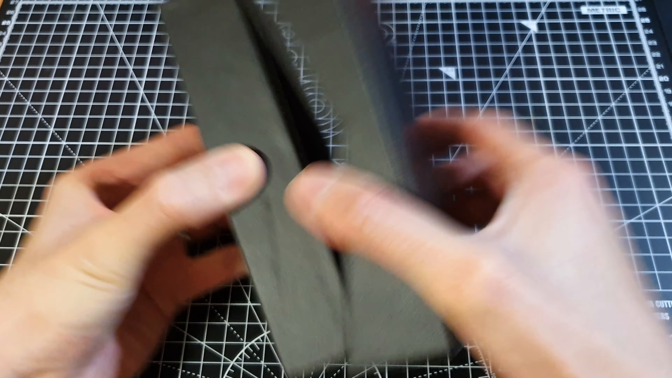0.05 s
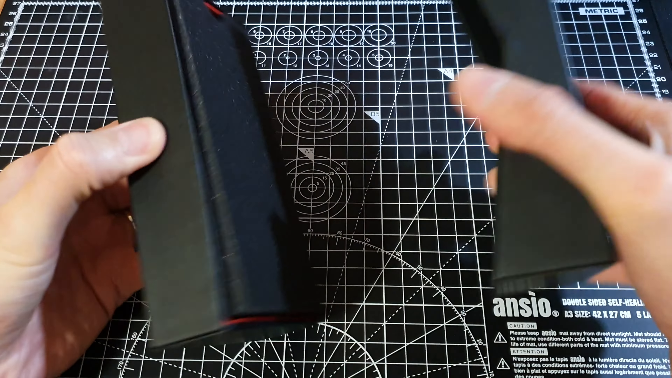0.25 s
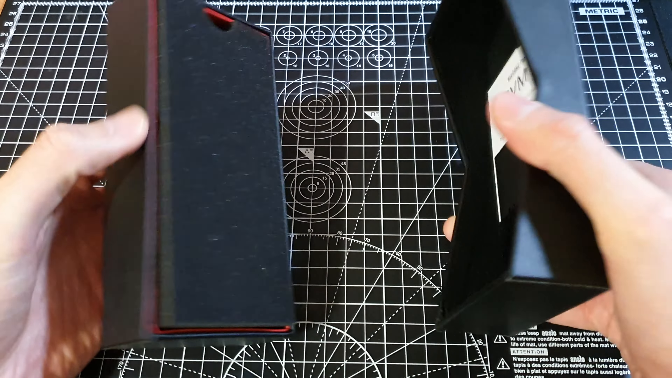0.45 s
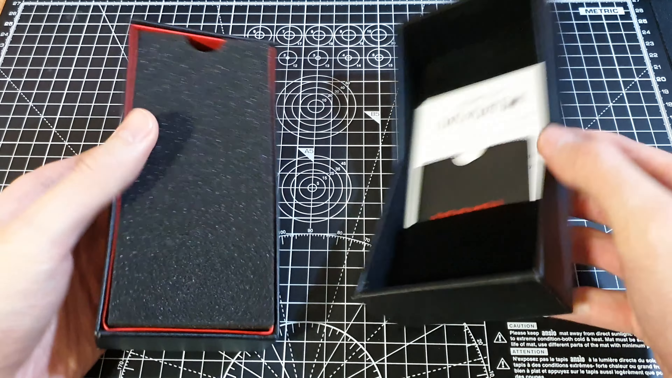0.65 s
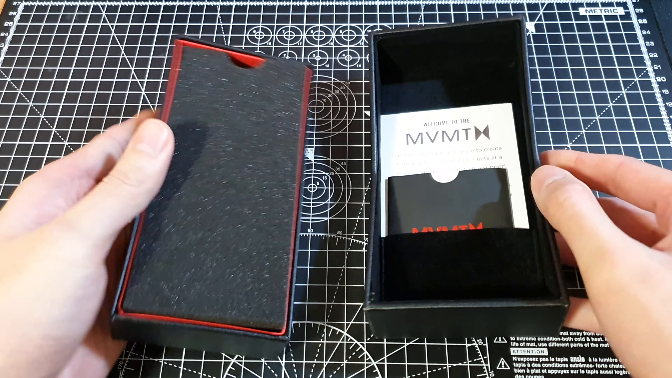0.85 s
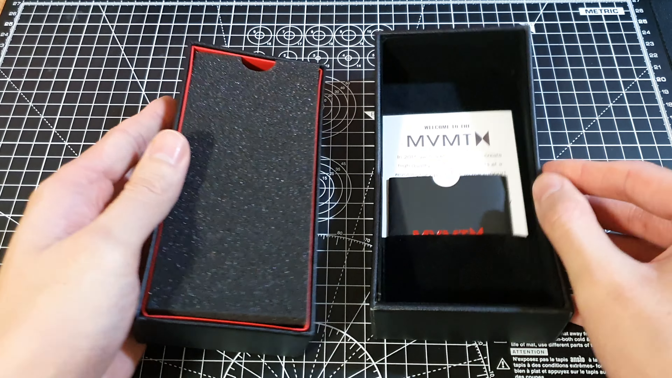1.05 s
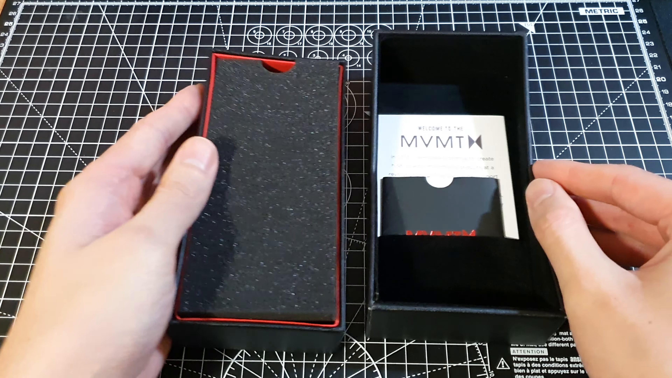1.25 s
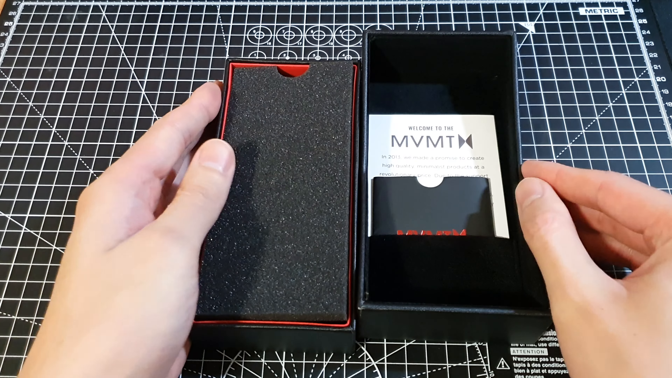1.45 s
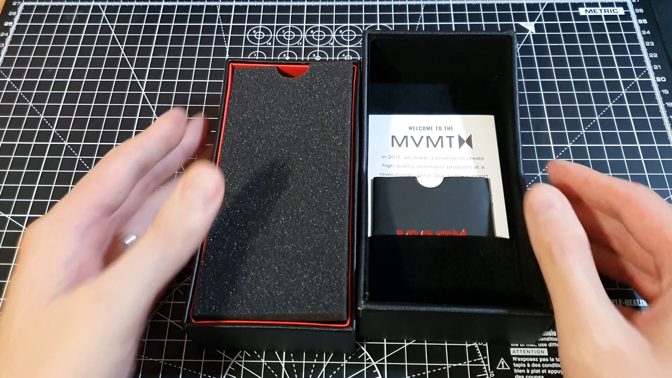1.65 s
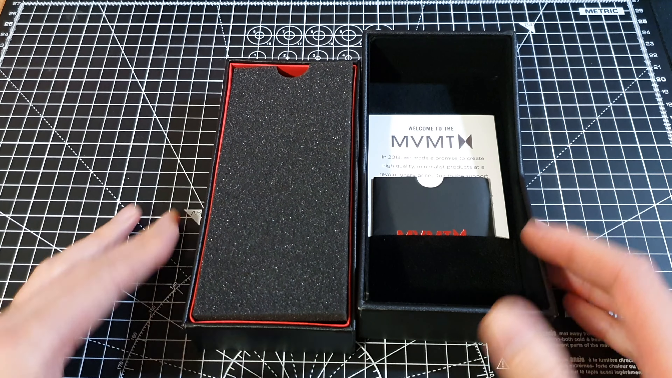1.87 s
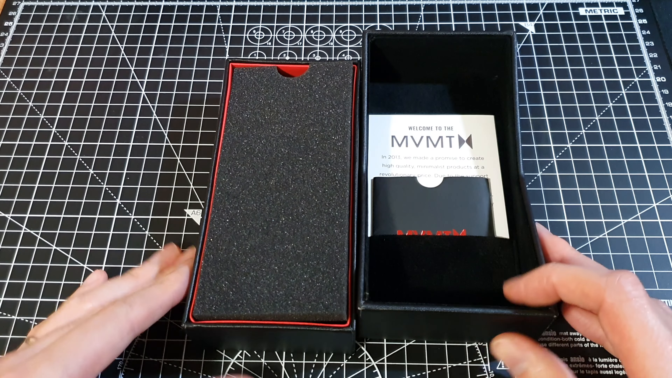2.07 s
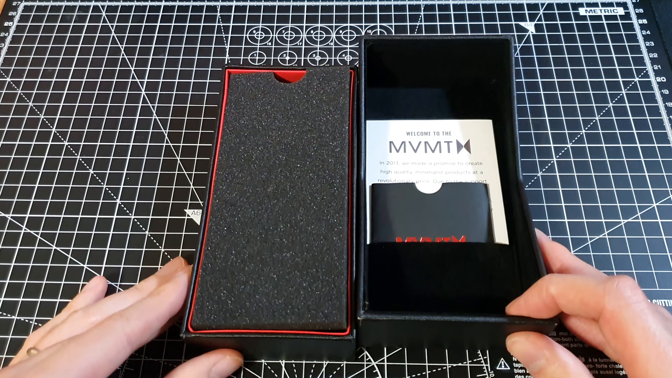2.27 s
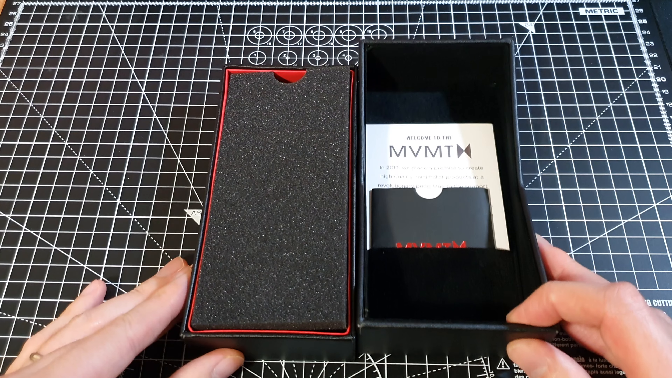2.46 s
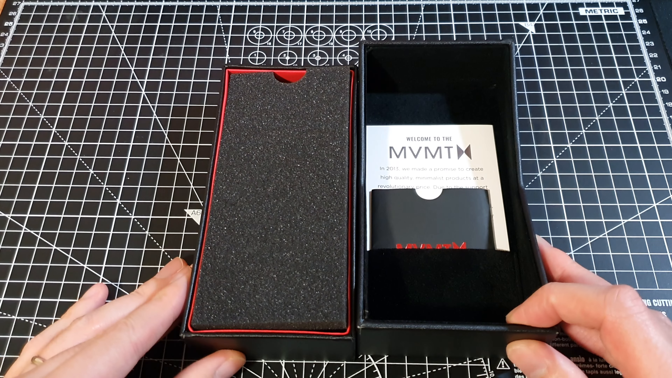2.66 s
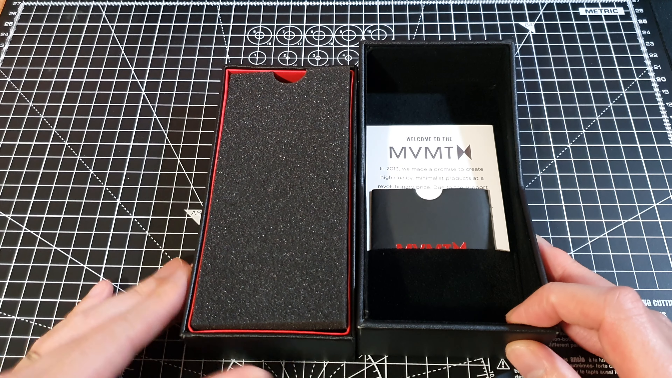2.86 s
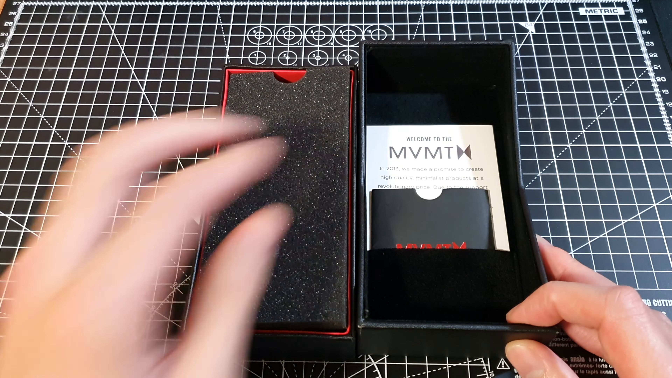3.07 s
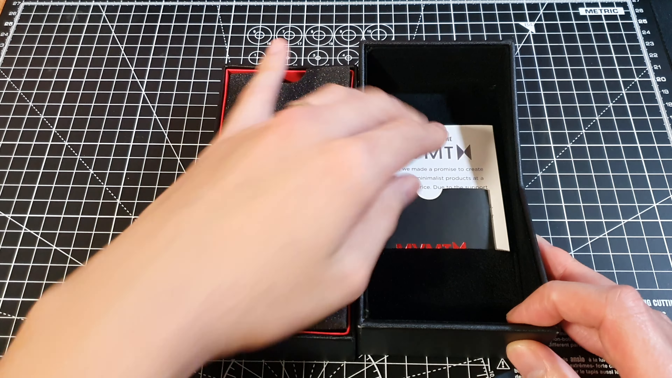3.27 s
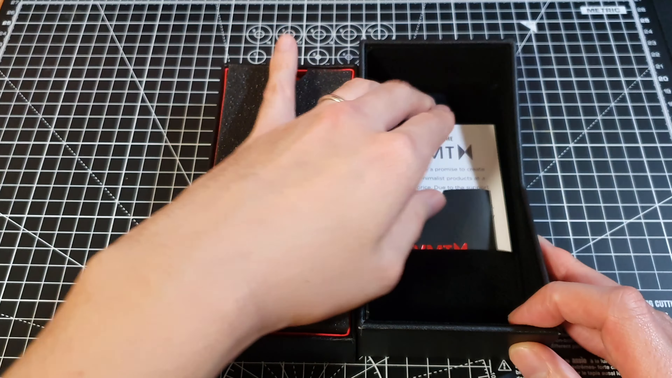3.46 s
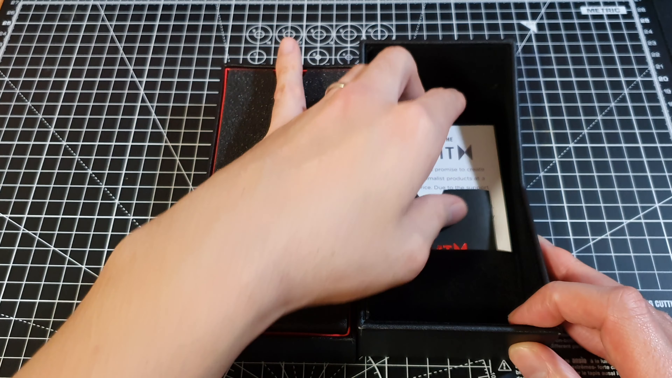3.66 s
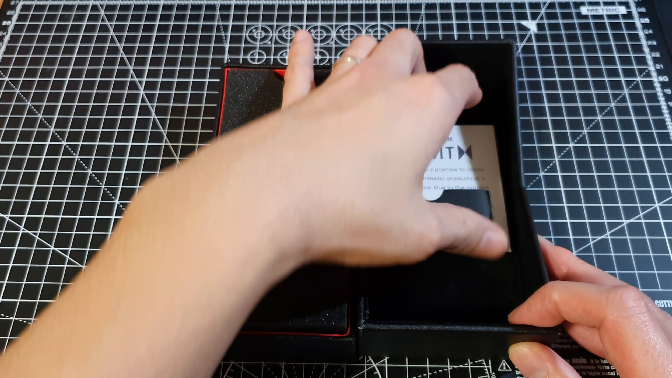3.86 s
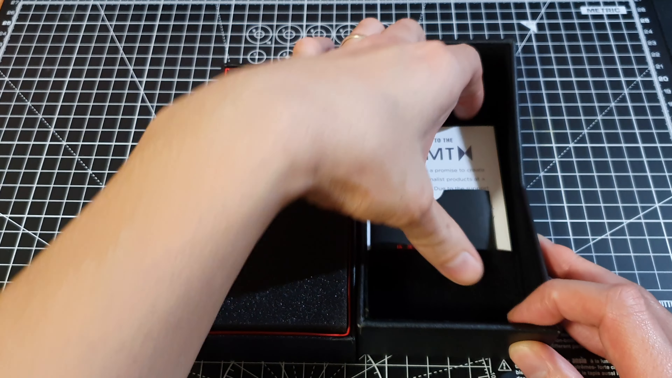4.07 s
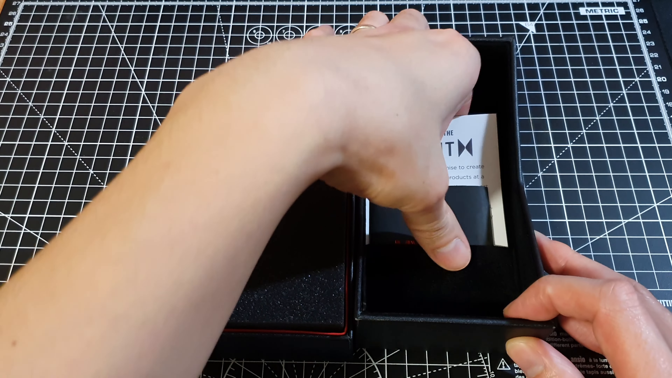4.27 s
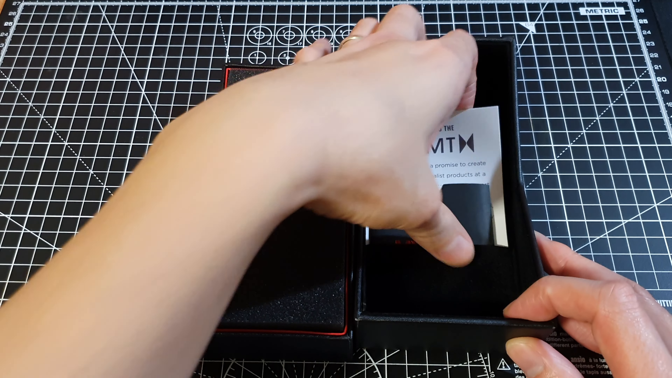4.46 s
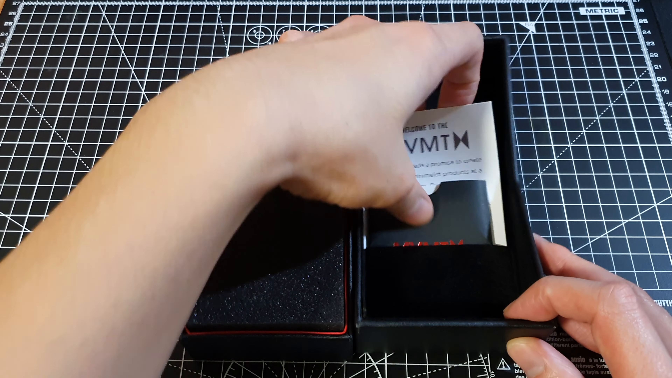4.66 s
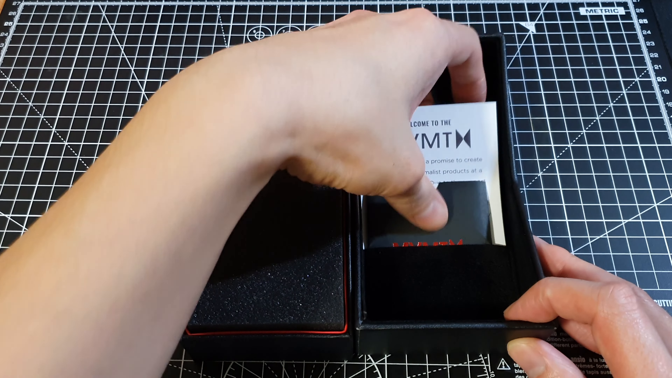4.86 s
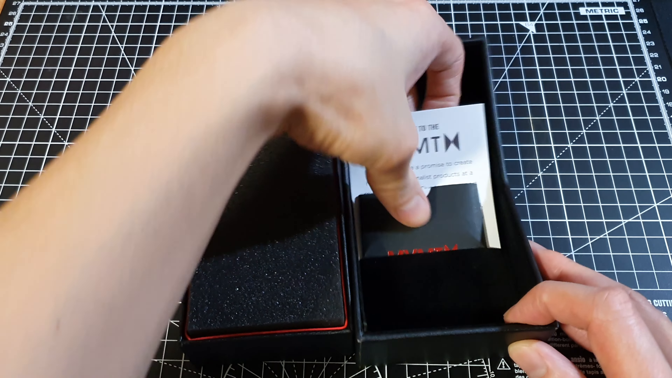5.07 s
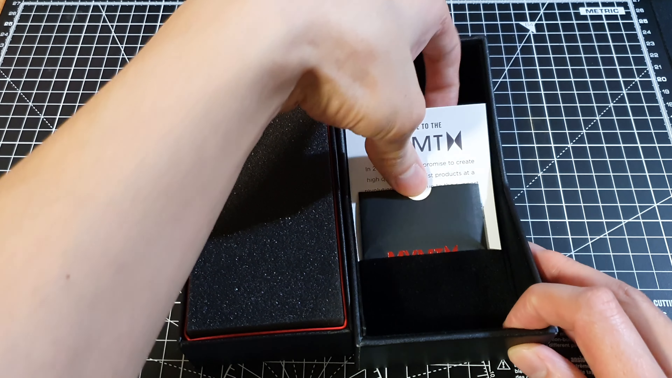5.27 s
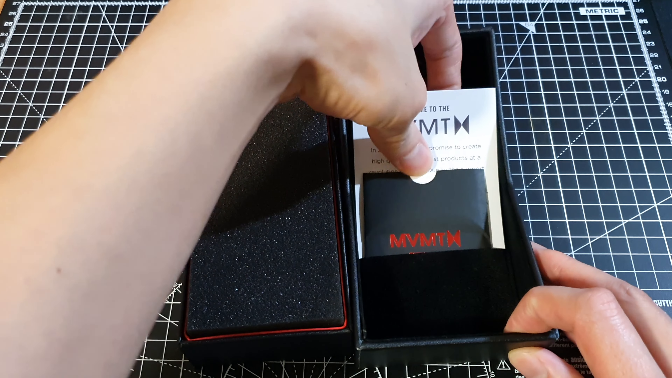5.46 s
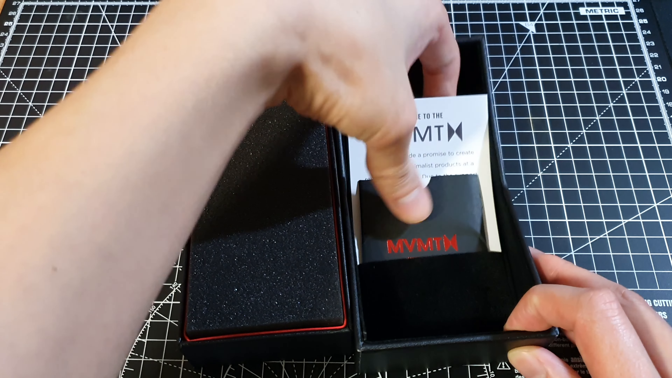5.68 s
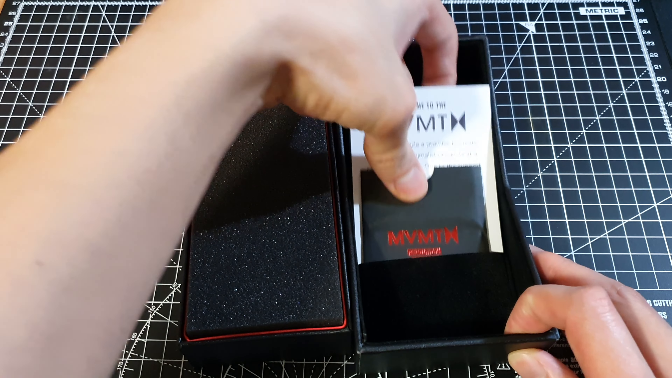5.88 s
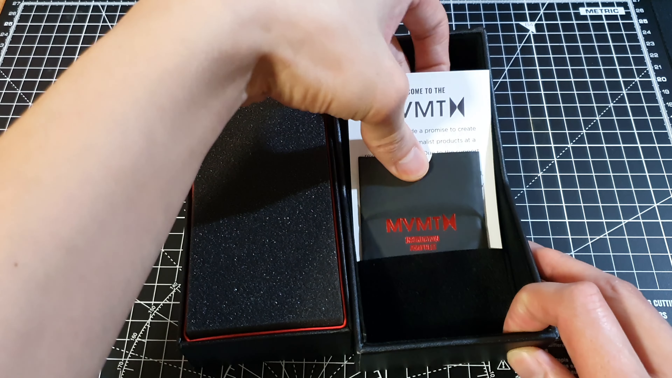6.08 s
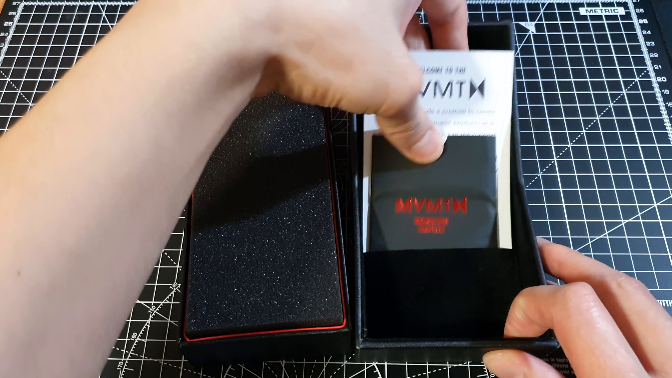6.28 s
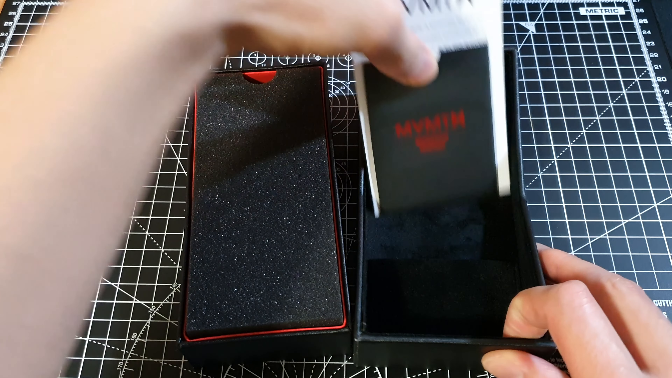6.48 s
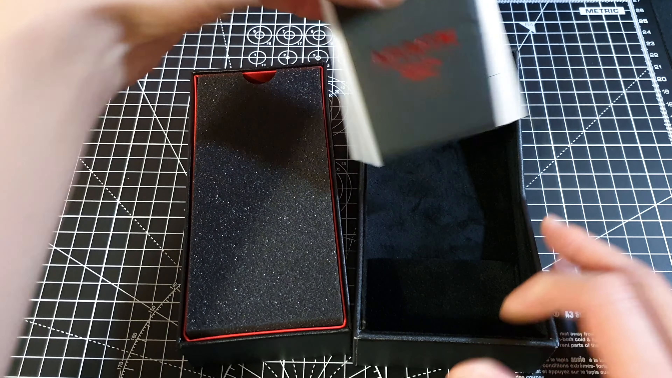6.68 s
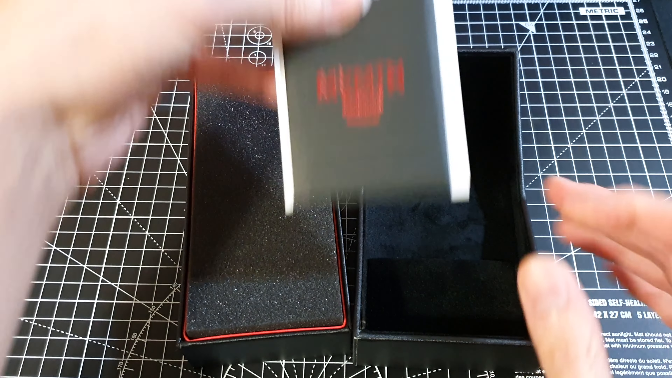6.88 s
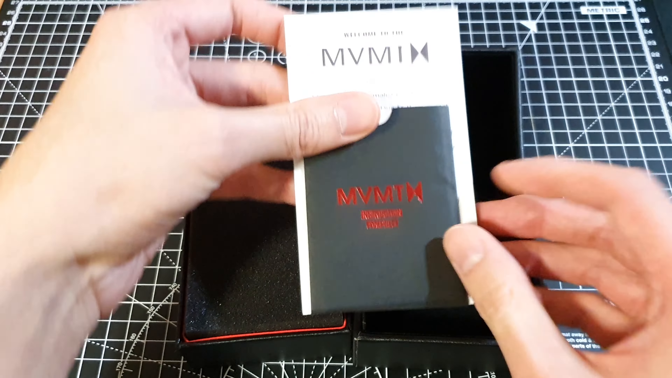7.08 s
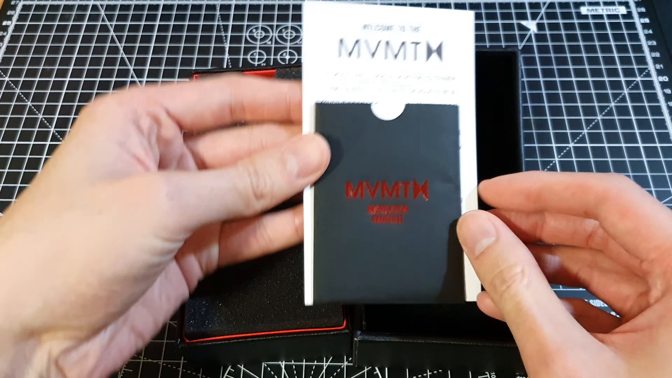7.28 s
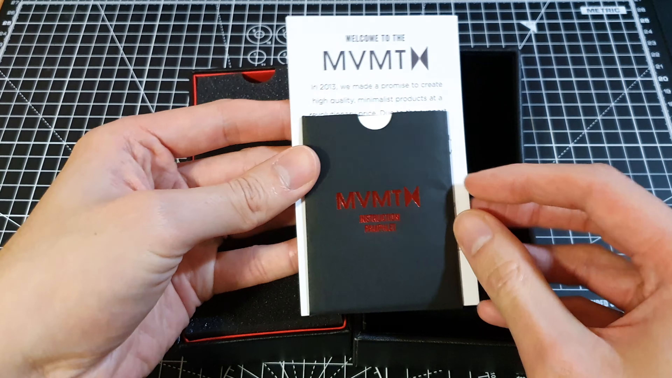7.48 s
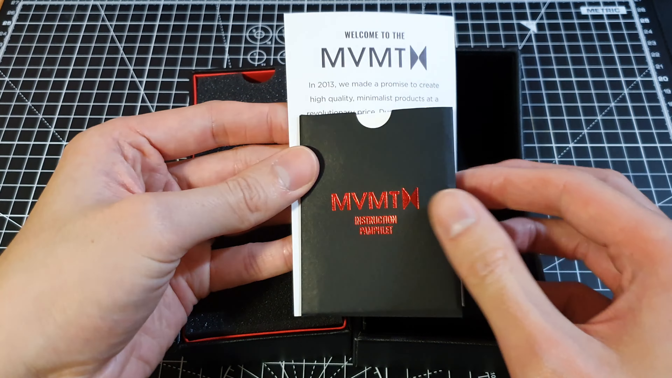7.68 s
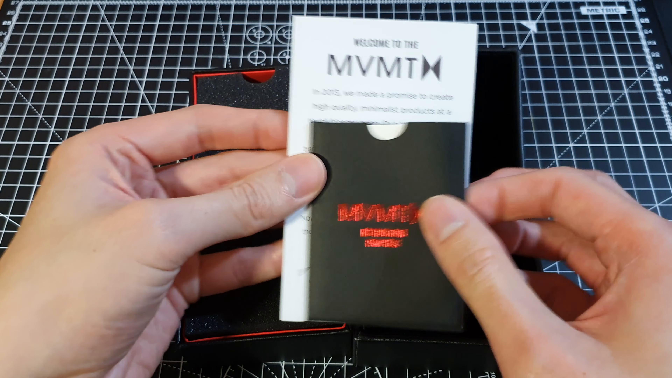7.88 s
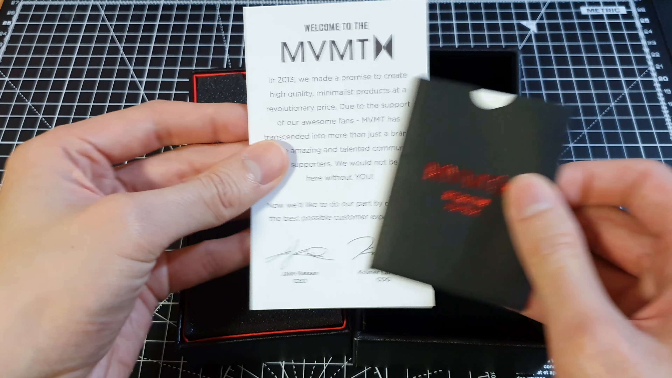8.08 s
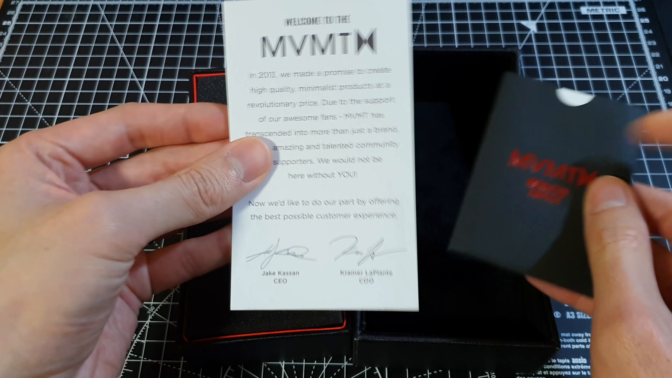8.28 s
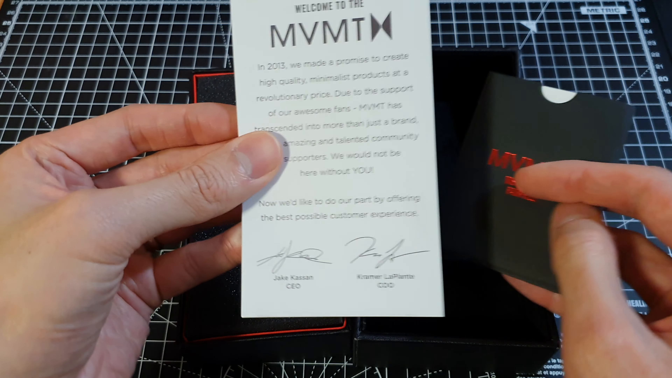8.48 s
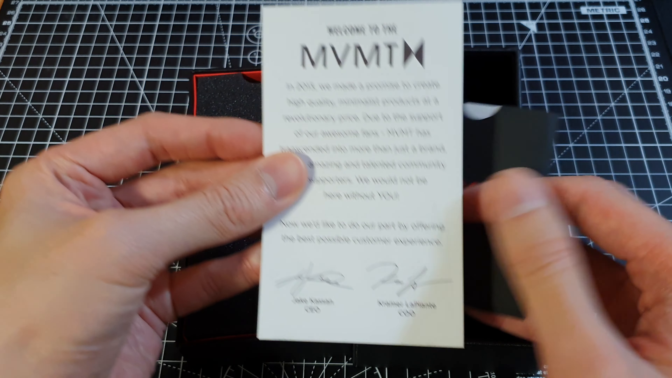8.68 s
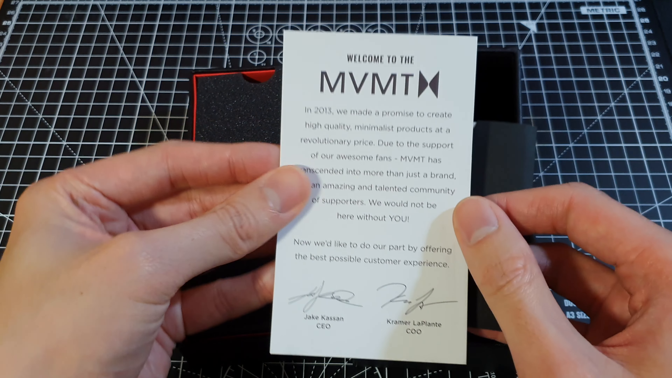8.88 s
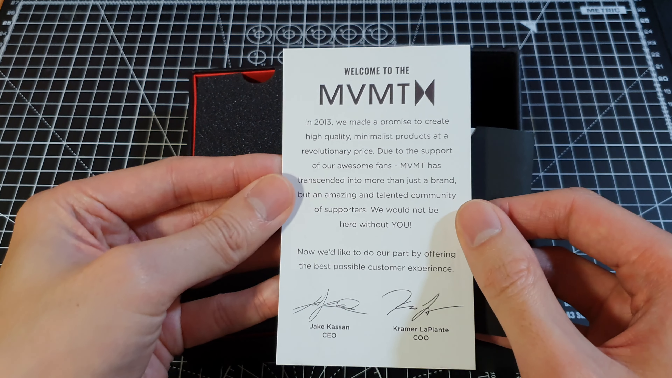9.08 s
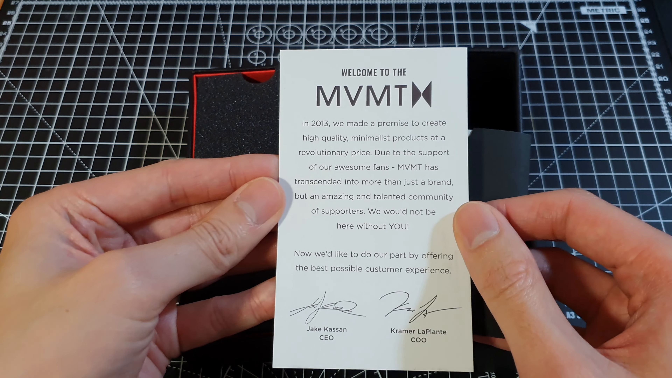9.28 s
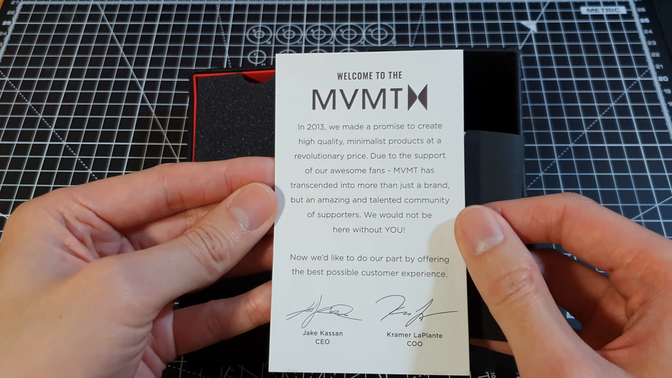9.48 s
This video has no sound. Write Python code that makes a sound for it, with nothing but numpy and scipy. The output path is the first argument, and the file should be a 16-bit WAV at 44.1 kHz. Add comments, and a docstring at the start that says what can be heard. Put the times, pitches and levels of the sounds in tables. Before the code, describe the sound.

In a small quiet room, a tight cardboard lid groans and rubs free with light taps, then the box halves clatter onto a desk, one blow very loud. Smaller knocks settle them together. After a near-silent pause, fingers brush and scratch inside, dragging out a card; the box drops with a thud, and card and paper sleeve slide apart with soft ticks. Close stereo microphone, faint hum.

```python
"""Opening a stiff cardboard box

On a desk in a small room the lid rubs off a box; both halves are knocked down and pushed together.
Fingers scuff inside, draw out a card in a paper sleeve (the box drops with a thud) and slide the two apart.
Blows are short bursts ringing the modes of board and desk; friction is noise in clumps and snaps, with
a colour for each pair of surfaces. Close echoes, a diffuse room, its background and faint hum surround them.
"""
import sys
import numpy as np
from scipy import signal
from scipy.fft import rfft, irfft, next_fast_len
from scipy.io import wavfile
from scipy.ndimage import uniform_filter1d, map_coordinates

SR = 44100
rng = np.random.default_rng(int(sys.argv[2]) if len(sys.argv) > 2 else 0)


def transcribe(u):
    """Save the signal u as a 16-bit wav file named by the first command-line argument.

    u: samples, shape (n,) or (channels, n), limited to [-1, 1]; the rate is SR.
    q: integer samples, one column per channel.
    """
    v = np.clip(np.atleast_2d(u).T, -1, 1)
    q = np.round(v * 32767).astype(np.int16)
    wavfile.write(sys.argv[1], SR, q)


N = 420713
TIME = np.arange(N) / SR
CONTROL_TIME = TIME[::32]  # coarse clock for slow gains
HIT_TIME = np.arange(SR // 2) / SR  # clock of one blow

# friction spectrum of card: (frequency [Hz], relative density [dB])
CARD_COLOUR = [(240, -21), (400, -34), (562, -19.5), (852, -5.5), (1200, -10), (1440, -1), (1820, -4.5),
               (1960, -10), (2750, -8), (3020, -4.5), (3930, -6.5), (4440, -14), (7170, -12.5),
               (16000, -34)]


def from_db(db):
    """Amplitude gain is ten to the power of decibels over twenty."""
    return 10 ** (np.asarray(db) / 20)


def rms_one(x):
    """Normalise to unit mean power."""
    return x / np.sqrt(np.mean(x ** 2) + 1e-20)


def peak_one(x):
    """Normalise a blow to unit power in its loudest 5 ms, both channels averaged."""
    power = np.mean(np.atleast_2d(x) ** 2, axis=0)
    return x / np.sqrt(uniform_filter1d(power, size=220).max())


def dying(t60):
    """Exponential decay: the amplitude falls by 60 dB in t60 seconds."""
    return 1000.0 ** (-HIT_TIME / t60)


def at_hz(points, hz):
    """Interpolate a spectrum along a logarithmic frequency axis."""
    f, value = np.transpose(points)
    return np.interp(np.log(np.maximum(hz, 1)), np.log(f), value)


def cut(x, hz, kind, order=2):
    """Causal Butterworth low- or high-pass filtering."""
    sections = signal.butter(order, min(hz, .45 * SR), kind, fs=SR, output="sos")
    return signal.sosfilt(sections, x + 1e-18)


def resonate(x, modes):
    """Modal superposition: parallel damped resonators of alternating sign."""
    out = 0
    for k, (hz, width, db) in enumerate(modes):
        r = np.exp(-np.pi * width / SR)  # pole radius sets the bandwidth
        poles = [1, -2 * r * np.cos(2 * np.pi * hz / SR), r * r]
        ringing = signal.lfilter([1, 0, -1], poles, x + 1e-18)
        out = out + (-1) ** k * from_db(db) * (1 - r * r) / 2 * ringing
    return out


def coloured(x, spectrum):
    """Interchannel coherence: two unrelated signals mix into a stereo pair, alike by frequency."""
    # likeness of left and right: (frequency [Hz], correlation [1])
    likeness = [(100, 1), (300, 0.61), (1000, 0.18), (3000, 1), (10000, 0.18)]
    size = next_fast_len(x.shape[1])
    hz = np.arange(size // 2 + 1) * SR / size
    alike = np.clip(at_hz(likeness, hz), -1, 1)
    mid, side = rfft(x, size) * from_db(at_hz(spectrum, hz))
    pair = np.sqrt(1 + alike) * mid + np.sqrt(1 - alike) * side * [[1], [-1]]
    return rms_one(irfft(pair, size)[:, :x.shape[1]])


def wander(per_s):
    """Slow random fluctuation of unit power, joining per_s random values each second."""
    knots = rng.standard_normal(N // 40)
    return rms_one(np.interp(TIME * min(per_s, 1000), np.arange(len(knots)), knots))


def pan(db):
    """Intensity stereo: gains for a left-right level difference."""
    return from_db(np.array([[db], [-db]]) / 2)


def add(out, s, sound):
    """Linear superposition of a sound at a given time."""
    i = max(round(s * SR), 0)
    out[:, i:i + sound.shape[-1]] += sound[..., :N - i]


def fibres(grain_db, judder_db, snap_db=12):
    """Friction noise: countless fibres snap in clumps, and a few stand out as crackle."""
    snaps_per_s, snap_spread_db = 170, 2.5
    is_snap = rng.random(N) < snaps_per_s / SR
    sizes = from_db(snap_db + snap_spread_db * np.minimum(rng.exponential(1, N), 4))
    clumps = from_db(grain_db * wander(900) + judder_db * wander(70))
    return rng.standard_normal((2, N)) * (clumps + is_snap * sizes)


def stick_slip(depth_db):
    """Stick-slip relaxation: each slip starts hard and dies away, at uneven intervals."""
    typical_rate_hz = 150
    phase = np.cumsum(typical_rate_hz * np.exp(.5 * wander(200))) / SR
    return from_db(-depth_db * (phase % 1))


def swell(peak_s, rise_s, fall_s, roundness):
    """Envelope of one hand movement: it gathers speed, peaks and eases off."""
    swing_db = 13.5  # lost over the rise or fall time
    before = (peak_s - CONTROL_TIME) / max(rise_s, .003)
    after = (CONTROL_TIME - peak_s) / max(fall_s, .003)
    return from_db(-np.minimum(swing_db * np.maximum(before, after) ** roundness, 200))


def stroke_gains(strokes):
    """Incoherent addition: overlapping strokes of rasp and hiss add in power."""
    power = 0
    for s, rise, fall, rasp_db, hiss_db in strokes:
        power = power + (from_db([[rasp_db], [hiss_db]]) * swell(s, rise, fall, roundness=1.41)) ** 2
    return [np.interp(TIME, CONTROL_TIME, np.sqrt(p)) for p in power]


def slip_gain(slips):
    """Friction threshold: a tight surface breaks free abruptly, slides evenly and sticks again."""
    gain = sum(from_db(db) * swell(s, length / 2, length / 2, roundness=4.9) for s, length, db in slips)
    return np.interp(TIME, CONTROL_TIME, gain)


def shifting(x):
    """Resonances shift with the free length of the card: a wandering reading rate moves the colour."""
    shift, changes_per_s = .06, 7  # shift as a share of pitch
    read = np.cumsum(1 + shift * wander(changes_per_s))
    return np.array([map_coordinates(channel, [read], order=3, mode="mirror") for channel in x])


def rub(strokes, colour, grain_db, judder_db, snap_db, split_hz=4500):
    """Sliding friction in two bands: pressure brings out the board's rasp, speed its surface hiss."""
    rasp_gain, hiss_gain = stroke_gains(strokes)
    friction = shifting(coloured(fibres(grain_db, judder_db, snap_db), colour))
    rasp = rms_one(cut(friction, split_hz, "low", order=5))
    hiss = rms_one(cut(friction, split_hz, "high", order=5))
    return rasp_gain * rasp + hiss_gain * hiss


def crush(t60, spread):
    """Contact noise: a brief burst of crushing fibres, a little different at each side."""
    rise_s = .0003
    mid, side = rng.standard_normal((2, len(HIT_TIME)))
    noise = mid + spread * side * np.array([[1], [-1]])
    return noise * dying(t60) * (1 - np.exp(-HIT_TIME / rise_s))


def contact(t60, spread, grit):
    """Impact excitation: crushing fibres, and a push of the whole edge 0.9 ms after they begin."""
    fibre = crush(t60, spread)
    push = signal.unit_impulse(len(HIT_TIME), 40)
    return push + grit * fibre / np.sqrt(np.sum(fibre ** 2) / 2)


def struck(blow):
    """Modal excitation: grip and point of contact vary the walls' ring at every blow and side."""
    # resonances of the cardboard walls: (centre frequency [Hz], bandwidth [Hz], centre level [dB])
    board = [(234.5, 70, -5), (338, 75, -2), (423, 33, -3), (460, 43, -4), (571.8, 25, 0.5), (631, 54, 1.5),
             (705, 84, 1), (830, 55, 4.5), (970, 85, -5), (1193, 130, -2), (1261, 130, -1.5),
             (1520, 43, -9.5), (1949, 210, -8), (2170, 86, -9.5), (2300, 300, -10), (2690, 140, -9),
             (3150, 452, -13)]
    detune_share, scatter_db = .015, 1.5
    detune, *sides = rng.standard_normal((3, len(board)))
    out = []
    for channel, side in zip(blow, sides):
        modes = [(hz * (1 + detune_share * d), width, db + scatter_db * g)
                 for (hz, width, db), d, g in zip(board, detune, side)]
        out.append(resonate(channel, modes))
    return np.array(out)


def thump(contact_hz):
    """Modal ringing of box on desk; a soft contact leaves only the lowest modes."""
    # modes of the box on the desk: (frequency [Hz], level before filtering [dB], t60 [s])
    desk_modes = [(67.25, -15.5, 0.3), (80, -1.5, 0.22), (129.2, -1, 0.3), (219, -11, 0.17),
                  (245.3, -12, 0.1661)]
    # starting sign of each mode [1]
    desk_signs = [-1, -1, 1, -1, 1]
    ring = 0
    for sign, (hz, db, t60) in zip(desk_signs, desk_modes):
        ring = ring + sign * from_db(db) * np.sin(2 * np.pi * hz * HIT_TIME) * dying(t60)
    return peak_one(cut(cut(ring, contact_hz, "low"), 60, "high"))


def crack(db, t60):
    """Level-dependent brightness: the board edge snaps and rings its corner, brighter when louder."""
    # resonances of the stiff corner: (frequency [Hz], bandwidth [Hz], relative level [dB])
    corner = [(1500, 100, 4.5), (2405, 110, 9.5), (3080, 160, 2)]
    top_hz = 3300 * 2 ** ((db + 33.0) / 45)
    snap = crush(t60, spread=0.93)
    ringing = cut(snap, 1100, "high") + resonate(snap, corner)
    return from_db(db) * peak_one(cut(ringing, top_hz, "low", order=3))


def background():
    """Stationary noise and pure tones: quiet room air and mains hum."""
    # spectrum of the room air: (frequency [Hz], relative density [dB])
    floor = [(20, -22.5), (45, -13), (90, -9.5), (145, -12), (215, -9.5), (320, -14), (600, -18.5),
             (3000, -27.5), (7500, -33), (10000, -39), (16000, -42)]
    # mains hum: (frequency [Hz], rms level [dB])
    hum_tones = [(100, -74), (200, -73), (250, -78)]
    air = from_db(-63.7) * coloured(rng.standard_normal((2, N)), floor)
    hum = 0
    for hz, db in hum_tones:
        hum = hum + from_db(db) * np.sqrt(2) * np.sin(2 * np.pi * (hz * TIME + rng.random()))
    return air + hum


def lid():
    """Cavity resonance: slips of the tight lid sound the hollow, its pitch changing as the gap opens."""
    # groaning slips: (middle [s], length [s], relative level [dB], pitch of the hollow [Hz])
    lid_slips = [(.008, 0.024, -29.5, 483), (0.033, 0.062, -38.5, 760), (0.157, 0.1, -33, 696),
                 (0.178, .045, -37, 736), (0.226, 0.048, -29.5, 806), (.665, 0.016, -33.5, 790)]
    # hollow under the lid: (multiple of its pitch [1], bandwidth [Hz], relative level [dB])
    hollow_modes = [(0.62, 300, -7.5), (1, 48.5, 9.5), (1.1, 70, 1.5), (1.269, 150, -3.5)]
    out = np.zeros((2, N))
    mid, side = fibres(grain_db=-2.0, judder_db=2.0, snap_db=7.5)[:, :SR]
    slips = mid + .5 * side * np.array([[1], [-1]])
    for s, length, db, hz in lid_slips:
        hollow = resonate(slips, [(multiple * hz, width, level) for multiple, width, level in hollow_modes])
        gain = slip_gain([(s, length, db - 4.5)])[:SR]
        add(out, 0, gain * rms_one(cut(hollow, 1300, "low")))
    return out


def box_rub():
    """Sliding friction of lid and box on each other and on the mat."""
    # strokes: (peak [s], rise [s], fall [s], relative rasp level [dB], relative hiss level [dB])
    strokes = [(.012, 0.052, 0.032, -51.5, -54.5), (.155, 0.055, 0.065, -49, -53.5),
               (.27, 0.14, 0.18, -59.5, -61.5), (.79, 0.2, 0.078, -40.5, -45.5),
               (.98, 0.2, 0.098, -48.5, -53), (1.45, 0.17, 0.058, -58, -68)]
    # friction spectrum of the box: (frequency [Hz], relative density [dB])
    colour = [(290, -46.5), (500, -6.5), (562, -16.5), (843, 2), (1060, -9), (1530, -9), (2390, -9.5),
              (3540, -14), (16000, -32.5)]
    return from_db(1.56) * rub(strokes, colour, grain_db=1.5, judder_db=1.5, snap_db=8)


def knocks():
    """Impact radiation: each blow cracks the edge, slaps the face, rings the walls and thumps the desk."""
    # box hits the desk and rocks to rest: (time [s], relative board level [dB], relative thump level [dB],
    # crack level [dB], wall low-pass cutoff [Hz], left-right difference of board and crack [dB])
    blows = [(0.159, -36.5, -22, -45, 810, -2), (0.429, -27.5, -21.5, -41.5, 970, 1),
             (0.72, -19.5, -15.5, -46.5, 840, -1), (0.7253, -11.5, -22, -32, 840, -0.5),
             (.785, -2.5, -8.5, -15, 1620, 1.5), (.790, -7.5, -14.5, -23.5, 950, -4.5),
             (.816, -16, -26, -28, 900, 5), (.831, -16.5, -25.5, -32, 1200, -1),
             (.878, -24, -23.5, -38.5, 1000, 2), (.931, -31.5, -32, -43, 750, -1.5),
             (1.0202, -15, -25.5, -44.5, 1500, -0.5), (1.202, -21, -19, -38, 1091, -3),
             (1.231, -31, -22.5, -48.5, 1190, 5), (1.428, -10, -18, -26.5, 1880, 3.5),
             (1.433, -12, -18, -30.5, 920, -2.5), (1.454, -18.5, -31, -36.5, 1290, 3),
             (1.465, -28, -38, -37, 1000, -3), (1.485, -35, -34, -90, 910, -8),
             (5.693, -30.5, -58, -48, 860, -3.5), (6.517, -22, -11.5, -29.5, 1600, -7),
             (6.529, -21, -31, -26, 944, 5.5)]
    out = np.zeros((2, N))
    for s, board_db, thump_db, crack_db, hz, side_db in blows:
        blow = contact(t60=0.026, spread=0.79, grit=1.98)
        face = resonate(blow, [(735.3, 660, -8.5), (1493, 1400, -9.0)])  # the damped panel speaks at once
        walls = peak_one(cut(face + struck(blow), hz, "low", order=3))
        board = from_db(board_db + 0.63) * walls
        add(out, s, pan(side_db) * (board + crack(crack_db, t60=0.032)))
        add(out, s + 0.0032, from_db(thump_db + 4.0) * thump(contact_hz=267.7))
    return out


def taps():
    """Light impacts: fingers and edges ring the walls and hollow; soft hand bumps only thump."""
    # finger and edge taps: (time [s], relative board level [dB], relative crack level [dB],
    # relative wall brightness [Hz])
    touches = [(0.182, -24, -52, 1040), (0.2105, -24, -55, 850), (0.293, -38.5, -40, 910),
               (0.338, -24.5, -38, 900), (0.528, -21.5, -36, 830), (3.432, -43.5, -58, 763),
               (4.132, -38, -63.5, 926), (4.204, -49, -56, 347), (4.775, -41, -45, 1560),
               (5.047, -27, -53, 934), (6.063, -34, -53, 1170), (6.098, -35, -46, 984),
               (6.698, -34.5, -56, 925), (8.867, -28.5, -57.5, 920)]
    # soft bumps of the hands on box and desk: (time [s], relative level [dB])
    bumps = [(0.542, -31.5), (0.658, -39), (0.976, -25), (1.813, -48), (2.039, -37.5), (2.772, -44),
             (3.416, -40.5), (3.458, -42), (4.127, -45.5), (4.199, -45), (4.701, -40), (5.241, -43.5),
             (5.353, -41.5), (5.717, -35), (5.757, -36.5), (6.055, -41.5)]
    out = np.zeros((2, N))
    for s, board_db, crack_db, hz in touches:
        touch = contact(t60=0.045, spread=0.88, grit=0.78)
        walls = from_db(-13) * struck(touch) + resonate(touch, [(874, 150, 0.0036)])
        walls = peak_one(cut(cut(walls, 600, "high", order=3), 1.1 * hz, "low"))
        add(out, s, from_db(board_db - 8) * walls + crack(crack_db - 2, t60=0.03))
    for s, db in bumps:
        add(out, s, from_db(db - 5.0) * thump(contact_hz=223))
    return out


def flicks():
    """Elastic release: a stiff edge lets go with a dry tick, and the card behind it gives a brief pock."""
    # flicked edges of box and card: (time [s], relative tick level [dB], tick low-pass cutoff [Hz],
    # relative card body level [dB])
    releases = [(0.7846, -2, 2400, -30), (1.4557, -16.5, 2620, -36), (1.47, -23, 2930, -45),
                (2.3679, -46, 2600, -56), (3.4335, -33.5, 7160, -53.5), (4.4534, -38, 3050, -59.5),
                (4.5185, -35, 4500, -59), (4.5641, -28.5, 3600, -61), (4.5923, -43, 5500, -51),
                (4.6938, -40, 4000, -44), (4.7136, -25.5, 2210, -55), (4.828, -21, 3330, -46),
                (4.971, -28, 2600, -36.5), (5.1115, -32, 2030, -51), (5.8379, -28, 4300, -43.5),
                (6.9702, -39, 3340, -56), (7.189, -32.5, 6720, -50), (7.2122, -37.5, 2590, -45),
                (7.7743, -32, 2660, -39), (7.8321, -36, 2900, -45), (7.9463, -33, 2840, -44.5),
                (8.0147, -28, 3170, -39), (8.0717, -46, 3500, -43), (8.3428, -30.5, 4200, -38.5),
                (8.405, -41.5, 6430, -49.5), (8.586, -45, 4980, -45), (8.708, -41.5, 5050, -50),
                (8.764, -44.5, 7300, -55.5), (8.8627, -35.5, 2554, -39.5), (9.203, -51.5, 5000, -51.5),
                (9.337, -50, 5000, -50.5), (9.394, -50.5, 6000, -53)]
    # resonances of a flicked card: (frequency [Hz], bandwidth [Hz], relative level [dB])
    card_body = [(563, 160, -7), (930, 150, 0.5), (1250, 520, -5.5), (2150, 580, -14.5)]
    out = np.zeros((2, N))
    for s, db, hz, body_db in releases:
        snap = contact(t60=0.013, spread=0.9, grit=2.9)
        tick = peak_one(cut(cut(snap, 1700, "high"), hz, "low", order=3))
        body = peak_one(cut(resonate(snap, card_body), 2000, "low"))
        add(out, s, from_db(db - 7.5) * tick + from_db(body_db - 3.5) * body)
    return out * pan(-2.09)


def scuffs():
    """Stick-slip excitation: a brief catch swells and lets go, sounding one resonance of the card."""
    # catches of finger, lid or card: (time [s], relative level [dB], nominal length [s], resonance [Hz])
    catches = [(1.389, -31, 0.14, 900), (3.66, -54.5, 0.091, 2340), (4.516, -36.5, 0.018, 4450),
               (4.559, -34.5, 0.028, 3950), (4.585, -34.5, 0.016, 4800), (4.708, -32.5, 0.02, 1580),
               (4.797, -38.5, 0.018, 3100), (4.967, -28.5, 0.016, 2100), (5.059, -30.5, 0.016, 1540),
               (5.109, -31.5, 0.013, 1420), (5.37, -34, 0.031, 1250), (5.375, -37, 0.016, 3450),
               (5.764, -38, 0.01, 2060), (5.788, -37.5, 0.015, 2200), (5.838, -42, 0.016, 3460),
               (6.513, -25, 0.015, 1520), (6.566, -32.5, .016, 1450), (7.709, -49, 0.015, 2740),
               (7.791, -36.5, 0.046, 2280), (7.83, -36, 0.03, 2040), (8.033, -42, 0.026, 3140),
               (8.073, -37, 0.01, 3410), (8.339, -38, .012, 1950)]
    out = np.zeros((2, N))
    grains = fibres(grain_db=0.0, judder_db=3.5, snap_db=11.5) * stick_slip(depth_db=18)
    friction = coloured(grains, CARD_COLOUR)
    for s, db, length, hz in catches:
        age = HIT_TIME / max(length, .005) * 3  # the swell peaks at age 1
        piece = friction[:, round(s * SR):][:, :len(HIT_TIME)]
        ringing = rms_one(resonate(piece, [(hz, 0.25 * hz, 0)]))
        scuff = age ** 2 * np.exp(-2 * age) * (piece + 2.0 * ringing)
        add(out, s - .004, from_db(db - 3.5) * peak_one(scuff))
    return out * pan(-1.2)


def reach():
    """Sliding friction of the hand brushing over the rim."""
    # strokes: (peak [s], rise [s], fall [s], relative rasp level [dB], relative hiss level [dB])
    strokes = [(3.437, 0.023, 0.097, -50, -51.5), (3.755, 0.13, 0.037, -55.5, -57.5),
               (3.94, 0.09, 0.065, -71.5, -62), (4.225, 0.28, 0.076, -60, -58),
               (4.395, 0.037, 0.013, -58, -60.5)]
    # friction spectrum of the fingers: (frequency [Hz], relative density [dB])
    colour = [(400, -35.5), (700, -13), (900, 12), (1300, -4.5), (1900, -1.5), (2400, 1.5), (3200, -3.5),
              (4800, -17.5), (6400, -11), (8500, -21.5), (16000, -29)]
    return from_db(-2.5) * pan(-5.0) * rub(strokes, colour, grain_db=4, judder_db=0.0, snap_db=9)


def finger_dig():
    """Sliding friction of fingers digging for the card."""
    # strokes: (peak [s], rise [s], fall [s], relative rasp level [dB], relative hiss level [dB])
    strokes = [(4.575, 0.13, 0.093, -48, -58), (4.712, 0.055, 0.029, -40.5, -47),
               (4.842, 0.044, 0.075, -34, -44.5), (4.973, 0.026, 0.068, -47, -54.5),
               (5.112, 0.072, 0.094, -44, -59), (5.268, 0.062, .12, -50.5, -50),
               (5.382, 0.052, 0.022, -39.5, -48), (5.495, 0.056, 0.088, -40.5, -44.5),
               (5.78, 0.13, 0.1, -47, -55)]
    return from_db(-0.8) * pan(-2.4) * rub(strokes, CARD_COLOUR, grain_db=3.0, judder_db=2.0, snap_db=11.5)


def drag():
    """Friction-driven vibration: the box judders a little across the mat and its walls rumble."""
    # drags of the box: (middle [s], length [s], level [dB])
    slips = [(5.76, 0.16, -42)]
    # spectrum of the rumble: (frequency [Hz], relative density [dB])
    colour = [(30, -36.5), (60, 1), (130, 14.5), (230, 6.5), (380, 4), (520, -4), (750, -13), (1200, -33),
              (4000, -56.5)]
    return slip_gain(slips) * coloured(fibres(grain_db=7.0, judder_db=-2.5), colour)


def card_draw():
    """Sliding friction of the card drawn out of the box."""
    # strokes: (peak [s], rise [s], fall [s], relative rasp level [dB], relative hiss level [dB])
    strokes = [(5.985, 0.058, 0.12, -40.5, -45.5), (6.162, 0.039, 0.058, -45, -48),
               (6.252, 0.049, 0.093, -40, -45), (6.49, 0.087, 0.061, -34, -38),
               (6.575, 0.03, 0.078, -44.5, -53), (6.705, 0.061, 0.0086, -46.5, -58)]
    # friction spectrum of the drawn card: (frequency [Hz], relative density [dB])
    colour = [(240, -50), (400, -23), (570, -29.5), (655, -24), (893, -3.5), (1010, -1), (1840, -7.5),
              (2150, -22), (2510, -5.5), (2800, -13.5), (7170, -12.5), (16000, -27)]
    return from_db(-1.0) * pan(-1.6) * rub(strokes, colour, grain_db=-0.5, judder_db=0.5, snap_db=11.5)


def sleeve_slide():
    """Sliding friction of card and paper sleeve on each other."""
    # strokes: (peak [s], rise [s], fall [s], relative rasp level [dB], relative hiss level [dB])
    strokes = [(6.82, 0.041, 0.13, -58, -64.5), (7.27, 0.041, 0.025, -46.5, -45),
               (7.355, 0.095, 0.061, -51, -49.5), (7.48, 0.044, 0.057, -51.5, -60.5),
               (7.715, 0.039, 0.021, -39.5, -45.5), (7.835, 0.084, 0.05, -42.5, -51),
               (8.04, 0.079, 0.056, -47, -42.5), (8.17, 0.1, 0.069, -56.5, -55.5),
               (8.33, 0.13, 0.042, -52.5, -45.5), (8.44, 0.094, 0.16, -66.5, -60.5)]
    # friction spectrum of the sleeve: (frequency [Hz], relative density [dB])
    colour = [(240, -18), (400, -16.5), (446, -44), (489, -8.5), (687, -16.5), (777, -0.5), (1490, -3.5),
              (1870, -8), (2840, -1.5), (4310, -8), (7990, -7), (15000, -20), (16000, -14)]
    return from_db(-0.6) * pan(-0.71) * rub(strokes, colour, grain_db=2.0, judder_db=1.5, snap_db=7)


def near_walls(x, travel):
    """Comb filtering by close echoes, whose paths change length as the hands move."""
    # echoes off box walls, desk and hand: (mean delay [s], gain relative to the direct sound [1])
    near_echoes = [(.0007, -0.16), (.0013, 0.65), (.0021, 0.35), (.0034, -.55), (.0052, 0.61)]
    out, at = x.copy(), np.arange(N)
    for delay, gain in near_echoes:
        read = at - delay * SR * (1 + travel * wander(2.5))
        out += gain * np.array([np.interp(read, at, channel) for channel in x])
    return out / np.sqrt(1 + sum(gain ** 2 for delay, gain in near_echoes))


def room(x, gap_s=0.004):
    """Diffuse reverberation: octave bands of noise decay at their own rates, weak in the bass."""
    # decay of the room: (frequency [Hz], t60 [s])
    room_t60 = [(200, 0.29), (1000, 0.12), (4000, 0.19), (12000, 0.066)]
    tail = 0
    for low in 170 * 2.0 ** np.arange(7):
        noise = rng.standard_normal((2, len(HIT_TIME)))
        band = cut(cut(noise, low, "high"), 2 * low, "low")
        tail = tail + band * dying(at_hz(room_t60, low * np.sqrt(2)))
    tail = tail * np.clip(HIT_TIME / gap_s - 1, 0, 1)  # silent for one gap, fading in over the next
    return signal.fftconvolve(x, tail / np.sqrt(np.sum(tail ** 2) / 2), axes=1)[:, :N]


def scene():
    """Direct and reverberant sound: blows and friction close by, with the room behind."""
    blows = knocks() + taps() + flicks() + lid() + drag()
    rubbing = box_rub() + reach() + finger_dig() + card_draw() + sleeve_slide()
    friction = near_walls(rubbing + scuffs(), travel=.11)
    reverberation = room(from_db(-11.0) * blows + from_db(-12.5) * friction)
    return blows + friction + reverberation + background()


def record(dry):
    """Overload and band limiting: peaks beyond full scale clip, then the top is cut."""
    stopband_hz = 16800
    low_pass = signal.cheby2(16, 70, stopband_hz, fs=SR, output="sos")
    return signal.sosfilt(low_pass, np.clip(dry, -1, 1))


dry = scene()
out = record(dry)
transcribe(out)
```